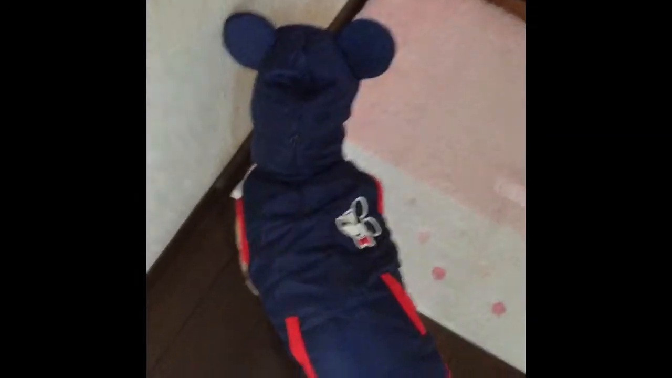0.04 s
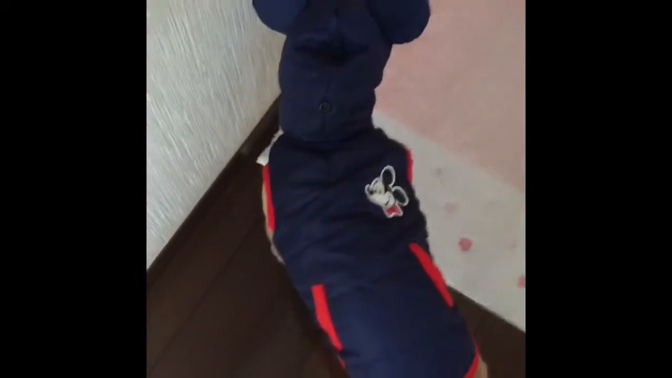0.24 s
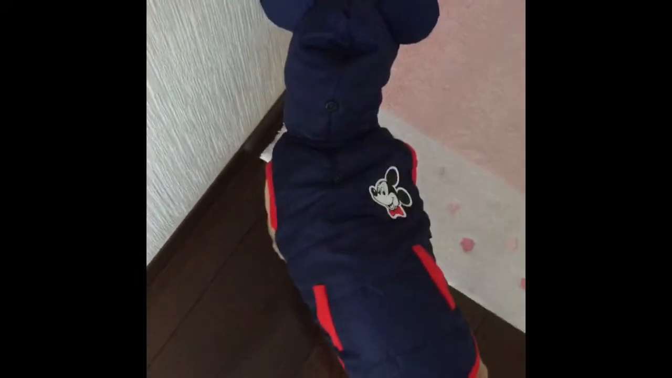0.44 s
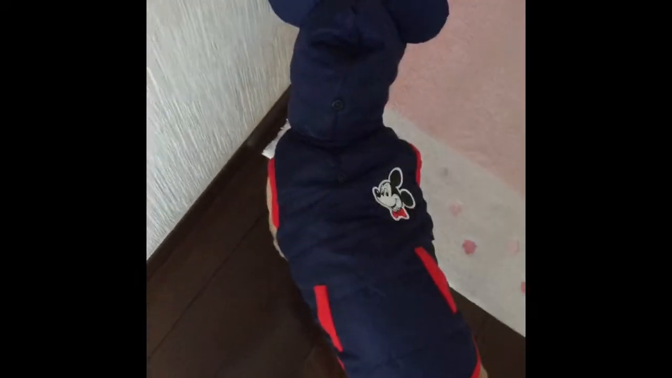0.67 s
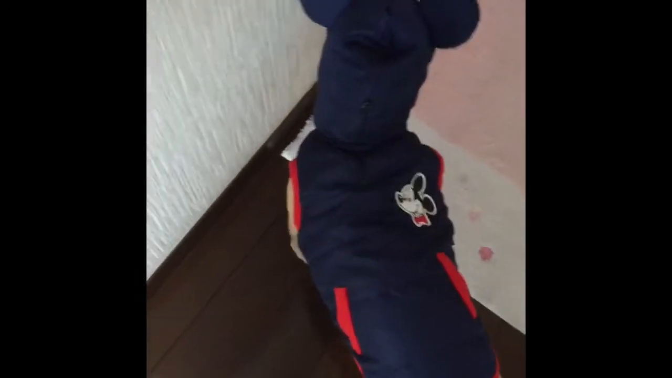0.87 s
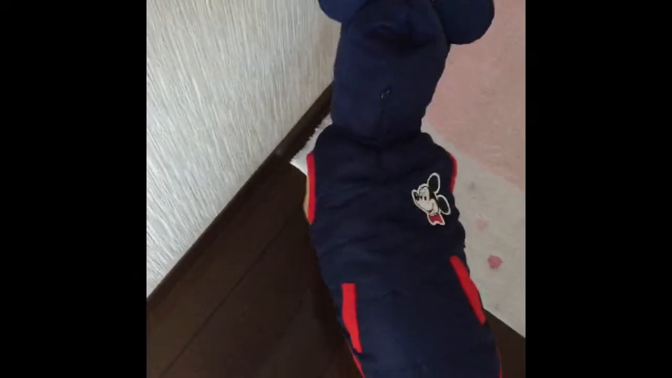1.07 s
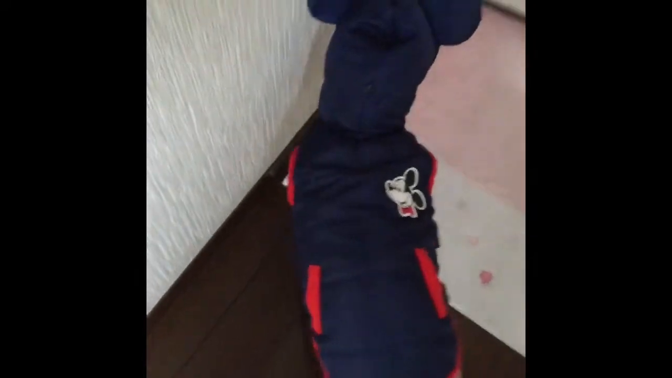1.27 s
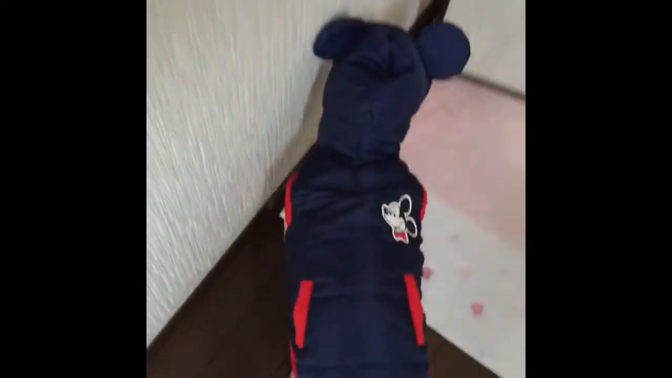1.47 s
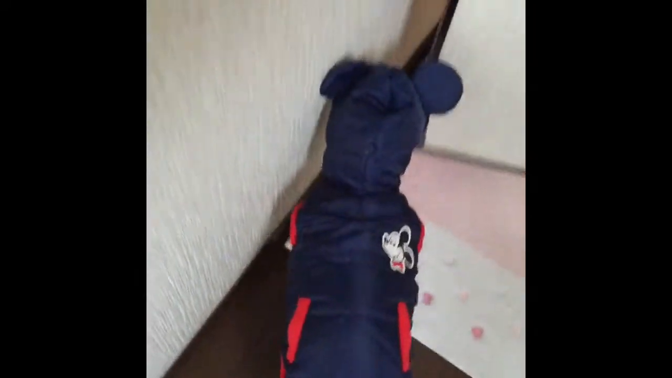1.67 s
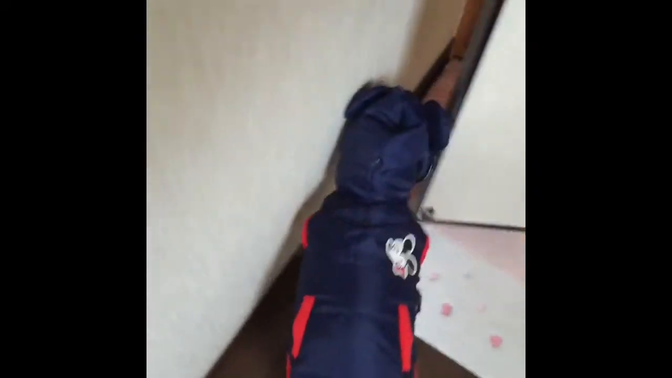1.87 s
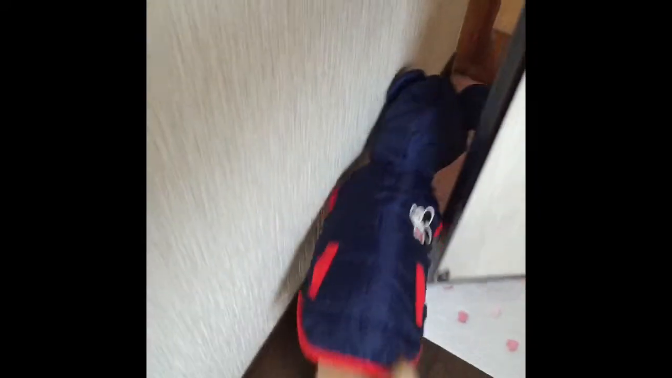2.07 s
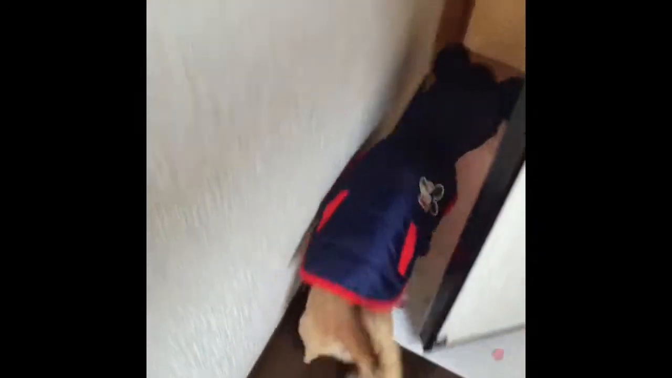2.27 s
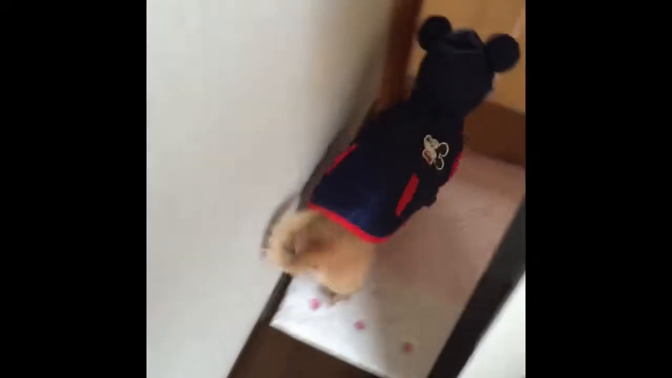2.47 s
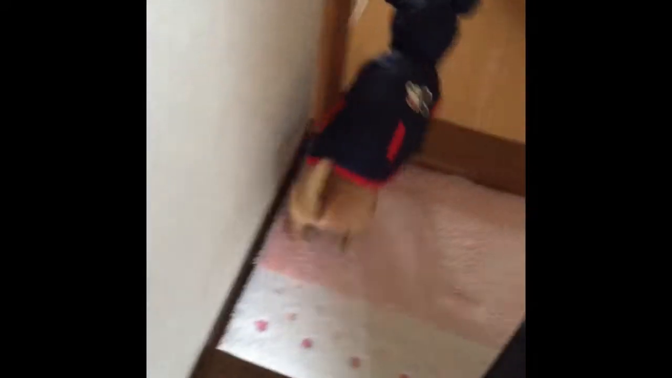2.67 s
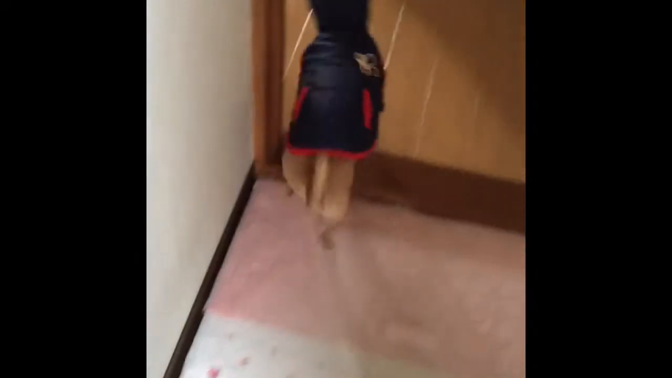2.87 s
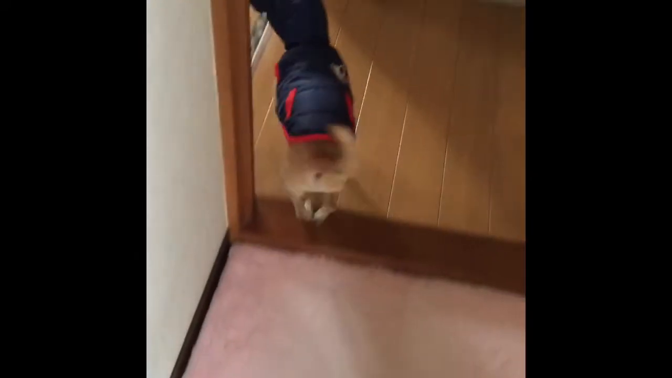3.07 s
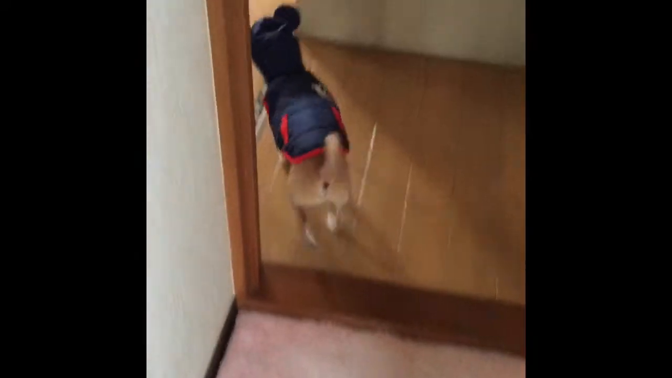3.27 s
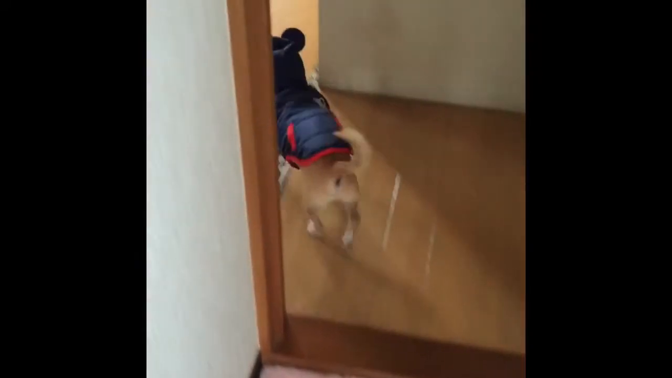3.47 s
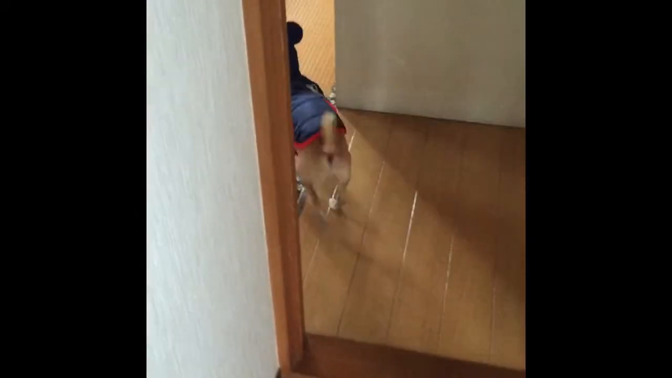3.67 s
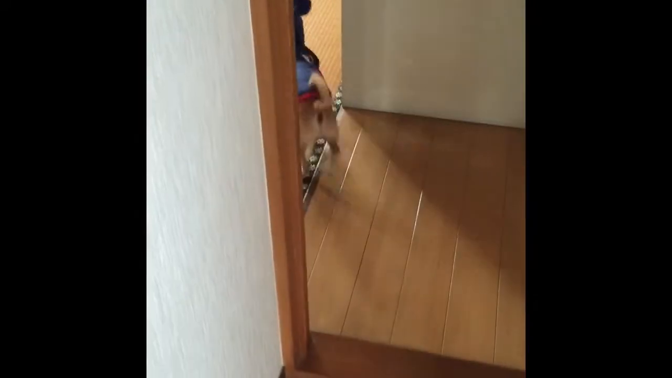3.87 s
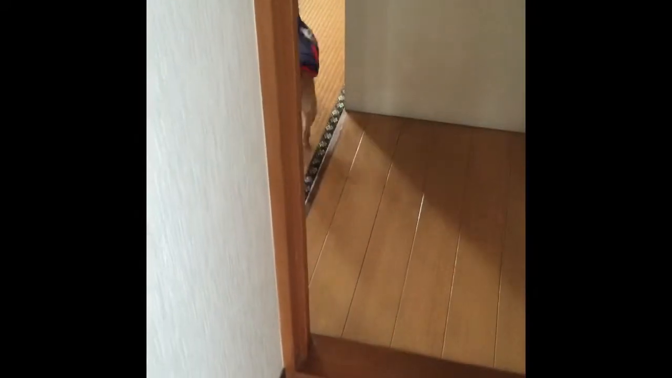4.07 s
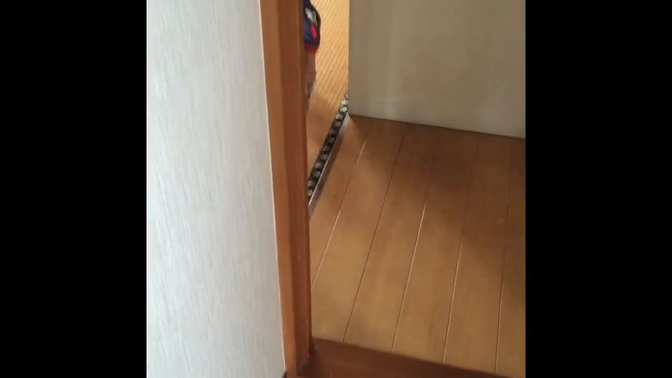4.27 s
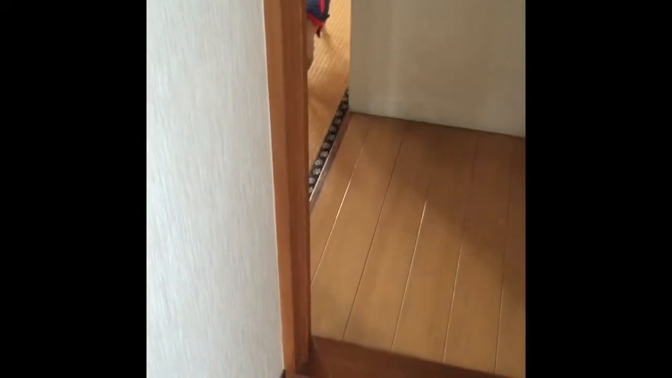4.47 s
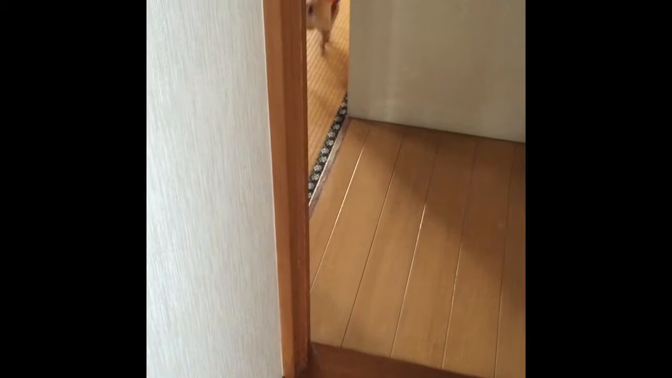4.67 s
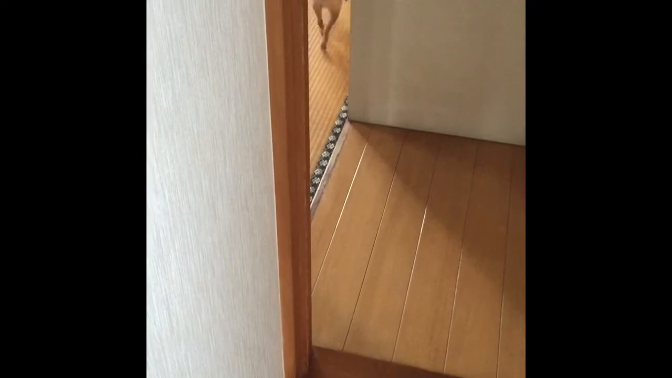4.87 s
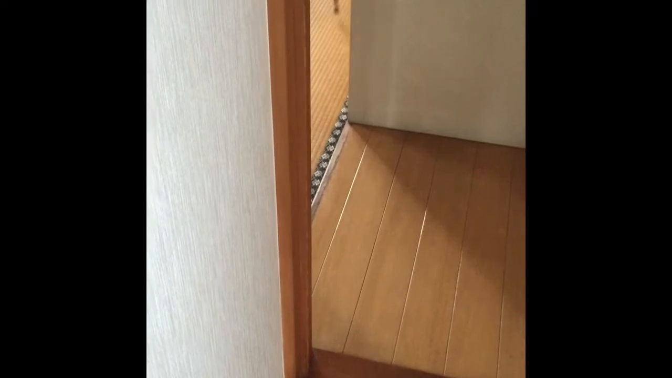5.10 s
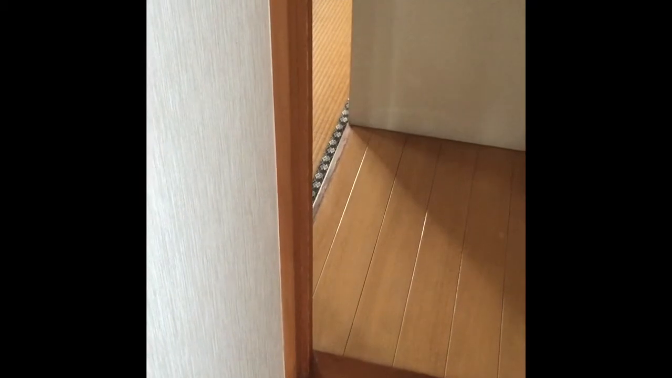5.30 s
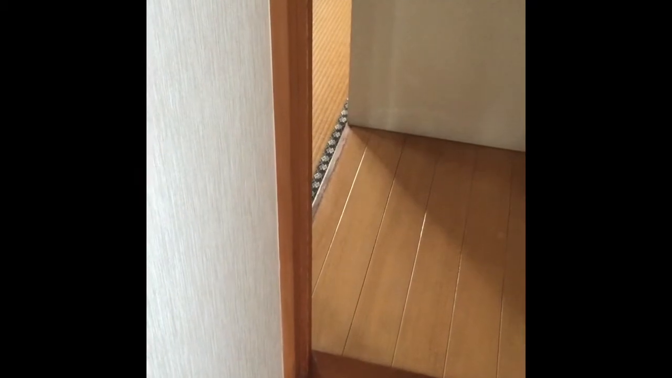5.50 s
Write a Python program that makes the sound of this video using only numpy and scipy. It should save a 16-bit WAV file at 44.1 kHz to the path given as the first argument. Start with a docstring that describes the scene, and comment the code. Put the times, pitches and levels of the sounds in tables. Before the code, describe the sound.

In a quiet narrow hall, a light door is bumped, giving one loud rattling knock with a low boomy thud and short wood rumble. Small thumps and faint nylon rustles follow. Then a small dog trots off, claws ticking quickly on wooden boards, about five a second, growing softer and blurrier. A phone microphone close to the door picks up soft room hush and hiss.

```python
"""A small dog in a nylon coat waits close by in a narrow hall, then trots off over a wooden floor.
Claws scratch-tick as skidding contacts ring the boards; body weight thuds as low board ringing.
A light door is knocked and slid: rattling contacts ring its panel, loaded wood rumbles and scrapes.
The coat rustles as crackly filtered noise. A small room answers, over hush, hiss and a shaken house."""
import sys
import numpy as np
from scipy import signal
from scipy.fft import rfft, irfft
from scipy.io import wavfile
from scipy.ndimage import uniform_filter1d

SR = 44100
rng = np.random.default_rng(int(sys.argv[2]) if len(sys.argv) > 2 else 0)


def dump(signal):
    """Clip the signal to [-1, 1] and save it as 16-bit WAV at the path in sys.argv[1]."""
    limited = np.clip(np.atleast_2d(signal).T, -1, 1)
    pcm = np.round(limited * 32767).astype(np.int16)
    wavfile.write(sys.argv[1], SR, pcm)


N = 244314

# claws landing: land_s, peak_db, centre_hz, knock_db (690-1770 Hz, relative to the peak)
CLAW_LANDINGS = [(2.6734, -55, 3950, 9), (2.9045, -39, 4460, -6), (3.0425, -51.5, 2800, 12),
                 (3.0973, -24.5, 2200, -22), (3.2785, -23.5, 2700, -13), (3.491, -27, 3040, -10),
                 (3.6567, -55.5, 2280, 13), (3.683, -26, 4000, -18), (3.7132, -34, 3250, -22),
                 (3.871, -31, 2200, -2), (3.8962, -35.5, 3300, -4), (4.0598, -25, 1960, -11),
                 (4.235, -30.5, 1990, -17), (4.428, -32, 2380, -20), (4.6057, -36, 2500, -14),
                 (4.7682, -36, 2140, -17), (4.9444, -39, 2500, -8), (5.118, -41.5, 2260, -15),
                 (5.2856, -44.5, 2280, -26), (5.4658, -45.5, 2200, -10)]
# claw skid in sight of the microphone, then behind the door post:
# hiss_db (relative to the peak), rise_ms, decay_ms, top_edge (multiple of the centre)
SKID_IN_SIGHT = (-4.5, 1.0, 4.5, 2)
SKID_BEHIND_POST = (-19, 2, 5.5, 1.55)
# floor boards ringing under a nail: pitch_hz, level_db, t60_s
FLOOR_MODES = [(1150, -2, .025), (1620, 0, .02), (2040, 0, .03), (2330, 1, .03), (2800, 0, .03),
               (3280, -1, .025), (3720, -3, .025), (4300, -2, .025), (5600, -5, .02)]
# weight coming down on the boards: land_s, peak_db, lowest_ring_hz
WEIGHT_LANDINGS = [(0.305, -45, 73.3), (0.423, -43.5, 59), (0.563, -31.5, 68), (0.68, -21.5, 65.8),
                   (0.725, -17, 77.5), (0.954, -19.5, 73.7), (1.068, -29.5, 72.5), (1.246, -38.5, 81.7),
                   (1.795, -40, 140.5), (1.849, -38.5, 83), (1.971, -37.5, 69.6), (2.181, -39.5, 69),
                   (2.485, -48.5, 67), (2.837, -33.5, 76.5), (3.063, -39.5, 68.1), (3.283, -36.5, 93),
                   (3.491, -41, 65.44), (3.683, -44.5, 101.5), (3.876, -41, 90), (4.057, -45, 60.4),
                   (4.234, -42.5, 98.2), (4.431, -50, 52.7), (4.605, -47, 114.7), (4.784, -46.5, 56.3),
                   (4.974, -44.5, 63.4), (5.146, -43, 58.2), (5.313, -47, 63.5), (5.468, -62, 53.7)]
# boards ringing under the weight: multiple of the lowest ring, level_db, t60_s
BOARD_MODES = [(1, 4.5, 0.18), (1.7, -8, 0.28), (2.7, -13.5, 0.14), (3.8, -22, 0.19)]
# door knocks: start_s, peak_db, crack_db (relative to the peak), centre_hz, rattle_decay_ms
DOOR_KNOCKS = [(0.548, -35, -35, 400, 2.9), (.625, -32.5, -31, 920, 24), (0.638, -21.5, -47, 1760, 8.2),
               (.727, -9, -44, 1800, 6.3), (.735, -13.5, -6.5, 1870, 5.8), (0.94, -34.5, -21, 607, 6.3),
               (1.308, -32, -49, 910, 8.1), (1.353, -39, -15, 870, 7)]
# door panel ringing: pitch_hz, level_db, t60_s
DOOR_MODES = [(400, 1, .06), (570, -4, .05), (790, -3, .04), (900, -2, .04), (1030, -3, .04),
              (1270, 0, .035), (1490, -2, .03), (1950, 5, .035), (2090, 5, .035), (2270, 2, .03),
              (2600, -2, .025)]
# short narrow rasps of the door in its rail: start_s, peak_db, centre_hz, rise_and_decay_ms
RAIL_RUBS = [(1.06, -40.5, 934, 17.6), (1.099, -51, 920, 6.4), (1.203, -55, 1030, 10)]
# wood groaning under a shifted load: full_load_s, hold_s, rumble_db, centre_hz, scrape_db
WOOD_SLIDES = [(0.634, 0.066, -40.5, 174, -47.5), (0.743, 0.0064, -27, 212, -41),
               (0.886, 0.044, -51, 203, -56.5), (1.076, 0.021, -52, 161, -61),
               (1.281, 0.057, -54, 226, -58), (1.779, 0.074, -46, 237, -58.5),
               (1.956, 0.03, -58.5, 193, -53), (2.027, 0.1, -51.5, 336, -57.5),
               (2.196, 0.033, -51, 216, -90), (2.624, 0.018, -52.5, 178, -70.5),
               (2.675, 0.027, -54.5, 177, -62.5), (2.828, 0.14, -57.5, 177, -70),
               (3.044, 0.017, -51.5, 231, -57.5)]
# steady swish of the coat on the walk:
# start_s, hold_s, level_db, high_db (bright part, relative), rise_db_per_s, fall_db_per_s
WALK_SWISH = 2.5, 1.72, -62.5, -6, 35, 57
# coat rubbing as the dog turns: firmest_s, level_db, high_db (relative), rise_and_fall_db_per_s
COAT_RUBS = [(2.007, -50, -7.5, 104), (2.15, -59.5, -12, 138), (2.573, -57.5, 2.5, 252),
             (2.7, -66.5, -35, 203), (3.15, -68.5, 2.5, 69)]
# short flicks of the coat: start_s, peak_db, high_db (bright part, relative), decay_ms
COAT_FLICKS = [(0.034, -42.5, -12, 19), (1.074, -45.5, 1.5, 14), (1.207, -40, -2.5, 24)]
# the slam shakes the house, a jolt then a slow settling:
# peak_s, level_db, rise_db_per_s, fall_db_per_s
HOUSE_SHAKES = [(.74, -22, 342, 90), (1.1, -50, 350, 13)]
# spectral shape of room hush and microphone hiss: frequency_hz, relative_level_db
HUSH_SHAPE = [(59, -46), (100, -23), (146, -6.5), (319, -12.5), (477, -16), (682, -17.5), (1130, -18),
              (1430, -20.5), (1760, -16.5), (1920, -19.5), (2220, -16.5), (2810, -19.5), (15500, -30.5)]
# decay of the hall: centre_hz, t60_s
ROOM_DECAY = [(125, 0.38), (350, 0.23), (1000, 0.19), (2800, 0.17), (7000, 0.094), (13000, 0.15)]
# dips of the microphone port: centre_hz, width_hz, depth (0-1)
PORT_DIPS = [(4880, 210, 0.4), (10500, 520, 0.57)]

HIDDEN_S = 3.8  # from here the door post stands between dog and microphone
BLUR_MS_PER_S = 0.83  # the rise lengthens once the steps arrive round the corner
BRUSH_IN_SIGHT_DB, BRUSH_BEHIND_POST_DB = -24, -14  # pad brush, relative to the claw peak
SLIDE_RISE_DB_PER_S, SLIDE_FALL_DB_PER_S = 497, 151
HUSH_DB, SHUDDER_DB, ROOM_DB = -61.5, -62.5, -7.5
# the claws' send to the room grows as the dog walks off
FURTHER_DB, FURTHER_DB_PER_S, LEAVES_S = -3, 6, 2.93
TOP_HZ = 15300


def undb(db):
    """Amplitude ratio of a level in dB."""
    return 10 ** (np.asarray(db) / 20)


def unit(x):
    """Scale to an RMS of one."""
    return x / np.sqrt(np.mean(x ** 2))


def peak(x, db):
    """Scale to a peak of db."""
    return x * undb(db) / np.abs(x).max()


def band(x, lo_hz, hi_hz, order=2):
    """Butterworth band-pass."""
    edges = [lo_hz, min(hi_hz, .45 * SR)]
    return signal.sosfilt(signal.butter(order, edges, "band", fs=SR, output="sos"), x)


def add(out, start_s, x):
    """Mix x in from start_s."""
    i = int(start_s * SR)
    out[i:i + len(x)] += x[:N - i]


def swell(s, hold_s, db, rise_db_per_s, fall_db_per_s):
    """Gain that climbs to db at s, holds and falls away, in straight dB slopes."""
    t = np.arange(N) / SR - s
    rise = rise_db_per_s * np.clip(-t, 0, None)
    fall = fall_db_per_s * np.clip(t - hold_s, 0, None)
    return undb(db - rise - fall)


def ring(modes, spread_db, scatter, scale=1.):
    """Ringing after one blow; every blow lands elsewhere, which shifts and weights the modes anew."""
    hz, db, t60 = np.transpose(modes)[:, :, None]
    t = np.arange(SR // 3) / SR
    shift, weight = rng.standard_normal((2, len(modes), 1))
    pitch_hz = scale * hz * (1 + scatter * shift)
    waves = np.sin(2 * np.pi * pitch_hz * t) * undb(-60 * t / t60)
    return np.sum(undb(db + spread_db * weight) * waves, axis=0)


def chatter(rise_ms, decay_ms, grit_db):
    """Dense tiny contacts of uneven size that build up over rise_ms and die away over decay_ms."""
    n = 8192
    t_ms = np.arange(n) * 1000 / SR
    sizes = undb(grit_db * np.minimum(rng.exponential(size=n), 3))
    rise = (1 - np.exp(-t_ms / max(rise_ms, .3))) ** 2
    return rng.standard_normal(n) * sizes * rise * np.exp(-t_ms / max(decay_ms, 1))


def struck(contacts, modes, share):
    """The contacts themselves plus a share of the ringing that they cause."""
    rung = signal.fftconvolve(contacts, ring(modes, spread_db=2.0, scatter=.02))[:len(contacts)]
    return unit(contacts) + share * unit(rung)


def grit(db, clump_ms):
    """Noise made of uneven grains that come in clumps."""
    k = int(clump_ms * SR / 1000)
    sizes = np.minimum(rng.exponential(size=N // k + 1), 3)
    clumps = uniform_filter1d(np.repeat(sizes, k)[:N], k // 2)
    return rng.standard_normal(N) * undb(db * (clumps + .5 * rng.exponential(size=N)))


def claws():
    """Several nails strike and skid: contacts coloured by the spot that they hit, with a longer hiss."""
    out = np.zeros(N)
    for s, db, hz, knock_db in CLAW_LANDINGS:
        in_sight = s < HIDDEN_S
        hiss_db, rise_ms, decay_ms, top_edge = SKID_IN_SIGHT if in_sight else SKID_BEHIND_POST
        brush_db = BRUSH_IN_SIGHT_DB if in_sight else BRUSH_BEHIND_POST_DB
        blur_ms = BLUR_MS_PER_S * max(s - HIDDEN_S, 0)
        skid = chatter(rise_ms + blur_ms, decay_ms, grit_db=1.5)
        wood = struck(skid, FLOOR_MODES, 0.7)
        body = band(wood, hz / 1.67, hz * top_edge) + 1.2 * band(skid, hz / 1.2, hz * 1.2)
        flank = band(wood, 3250, 5540)
        knock = band(wood, 690, 1770)
        hiss = band(skid + 1.1 * chatter(1.0, 14.8, grit_db=4.0), 2900, 10100, order=1)
        landing = peak(body, db) + peak(flank, db + hiss_db - 2.0)
        landing = landing + peak(knock, db + knock_db) + peak(hiss, db + hiss_db)
        add(out, s - .003, landing)
        # the pad brushes the floor in a reversed chatter that builds up to the landing
        brush = band(chatter(0.45, 9.8, grit_db=5.0)[::-1], 950, 2270)
        add(out, s - len(brush) / SR, peak(brush, db + brush_db))
    return out


def thuds(contact_ms=3.6):
    """The weight comes down over the contact time and sets the boards ringing at the pitch of that spot."""
    out = np.zeros(N)
    for s, db, hz in WEIGHT_LANDINGS:
        boards = ring(BOARD_MODES, spread_db=4.5, scatter=0.011, scale=hz)
        t_ms = np.arange(len(boards)) * 1000 / SR
        rise = (1 - np.exp(-t_ms / contact_ms)) ** 2
        add(out, s - .004, peak(boards * rise, db))
    return out


def knocks():
    """The door rattles in its frame: contacts ring the panel and shiver on, with a bright crack on top."""
    out = np.zeros(N)
    for s, db, crack_db, hz, decay_ms in DOOR_KNOCKS:
        shiver = chatter(6.0, 58.0, grit_db=2.0)
        rattle = chatter(0.83, decay_ms, grit_db=4.0) + 0.1 * shiver
        wood = band(struck(rattle, DOOR_MODES, 0.31), hz / 3.4, hz * 1.17)
        crack = 1.5 * band(rattle, 1800, 6200) + band(rattle, 4800, 4900)
        crack = crack + 0.19 * band(rattle, 6200, 16200)
        add(out, s - .0015, peak(wood, db) + peak(crack, db + crack_db))
    return out


def rail_rubs():
    """The door rubs in its rail: a short narrow rasp of dense contacts."""
    out = np.zeros(N)
    for s, db, hz, ms in RAIL_RUBS:
        add(out, s, peak(band(chatter(ms, ms, grit_db=2.5), hz / 1.06, hz * 1.15), db))
    return out


def slides():
    """Stick-slip on wood: a hollow rumble round the loaded spot's resonance, a patchy scrape above it."""
    centres = 150 * 1.26 ** np.arange(6)
    hollows = [unit(band(grit(0.96, clump_ms=20.), c / 1.06, c * 1.096)) for c in centres]
    hollows = np.array(hollows)
    scrape, out = 0, 0
    # each part of the surface catches at its own moments
    for c in 750 * 1.18 ** np.arange(11):
        weight = (1500 / (c + 850)) ** 1.6
        scrape = scrape + weight * unit(band(grit(6.3, clump_ms=25.), c / 1.06, c * 1.074))
    for s, hold_s, rumble_db, hz, scrape_db in WOOD_SLIDES:
        # bands nearest the resonance weigh most
        rumble = (np.exp(-(np.log(hz / centres) / 0.33) ** 2) + 0.15) @ hollows
        load = swell(s, hold_s, 0, SLIDE_RISE_DB_PER_S, SLIDE_FALL_DB_PER_S)
        out = out + load * (unit(rumble) * undb(rumble_db) + unit(scrape) * undb(scrape_db))
    return out


def rustle():
    """Nylon fibres slip over each other: fine crackly hiss, in long rubs and short flicks."""
    fibres = grit(2.0, clump_ms=16.0)
    centres = 1100 * 1.25 ** np.arange(7)
    patches = sum(band(grit(3.0, clump_ms=22.), c / 1.12, c * 1.12) for c in centres)
    low = unit(unit(band(fibres, 1210, 7800)) + 0.89 * unit(patches))
    high = unit(band(fibres, 4600, 14540))
    s, hold_s, db, high_db, rise_db_per_s, fall_db_per_s = WALK_SWISH
    out = (low + high * undb(high_db)) * swell(s, hold_s, db, rise_db_per_s, fall_db_per_s)
    for s, db, high_db, slope_db_per_s in COAT_RUBS:
        out += (low + high * undb(high_db)) * swell(s, 0, db, slope_db_per_s, slope_db_per_s)
    for s, db, high_db, decay_ms in COAT_FLICKS:
        flick = chatter(2.3, decay_ms, grit_db=2.5)
        add(out, s, peak(band(flick, 930, 8300), db) + peak(band(flick, 5700, 15500), db + high_db))
    return out


def background():
    """Room hush and microphone hiss as shaped noise, over a low shudder and jolts of the house."""
    f = np.arange(1, N // 2 + 2) * SR / N
    hz, db = np.transpose(HUSH_SHAPE)
    shape = undb(np.interp(np.log(f), np.log(hz), db))
    hush = irfft(rfft(rng.standard_normal(N)) * shape, N)
    shudder = band(rng.standard_normal(N), 47, 88)
    jolt = band(rng.standard_normal(N), 31, 92)
    shaken = sum(swell(s, 0, db, rise, fall) for s, db, rise, fall in HOUSE_SHAKES)
    return unit(hush) * undb(HUSH_DB) + unit(shudder) * undb(SHUDDER_DB) + unit(jolt) * shaken


def room(x, sent):
    """Reflections of what is sent build up over a few ms and die away band by band."""
    t = np.arange(SR // 2) / SR
    tail = 0
    for hz, t60 in ROOM_DECAY:
        tail = tail + band(rng.standard_normal(len(t)), hz / 1.62, hz * 2.05) * undb(-60 * t / t60)
    tail = tail * np.clip(t / 0.0023, 0, 1)
    tail = tail / np.sqrt(np.sum(tail ** 2))
    return x + undb(ROOM_DB) * signal.fftconvolve(sent, tail)[:N]


def scene():
    """Dog, door and coat in the hall; the room answers the claws more as the dog walks off."""
    steps = claws()
    near = thuds() + knocks() + rail_rubs() + slides() + rustle()
    away_s = np.clip(np.arange(N) / SR - LEAVES_S, 0, None)
    further = undb(FURTHER_DB + FURTHER_DB_PER_S * away_s)
    return (room(near + steps, near + further * steps) + background())[None]


def record(dry):
    """The microphone port leaves two dips; the phone cuts the top."""
    for hz, width_hz, depth in PORT_DIPS:
        dry = dry - depth * band(dry, hz - width_hz / 2, hz + width_hz / 2, order=1)
    return signal.sosfilt(signal.ellip(10, .2, 70, TOP_HZ, fs=SR, output="sos"), dry)


dry = scene()
out = record(dry)
dump(out)
```